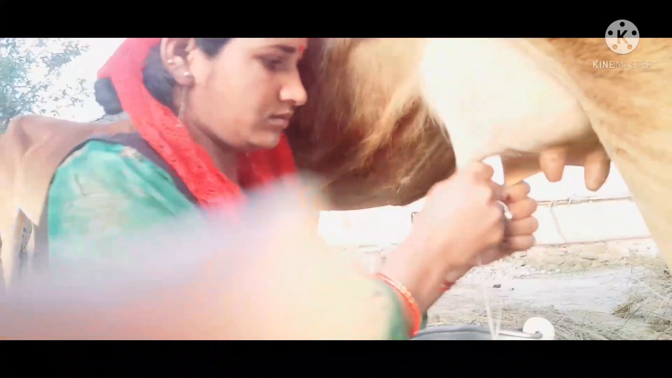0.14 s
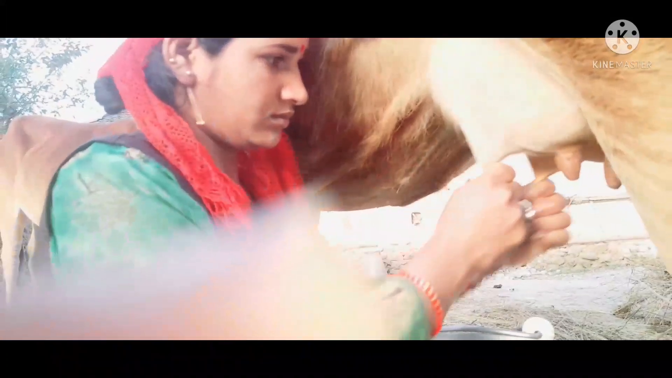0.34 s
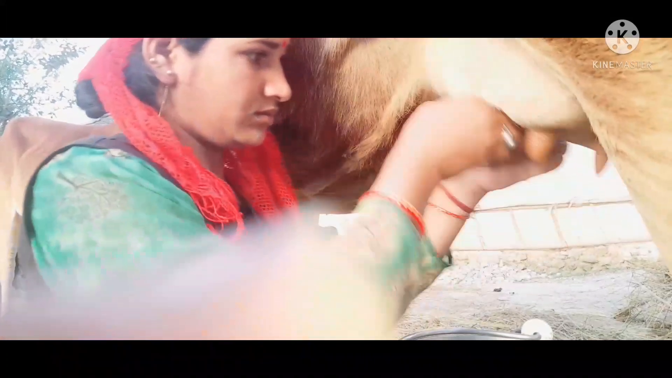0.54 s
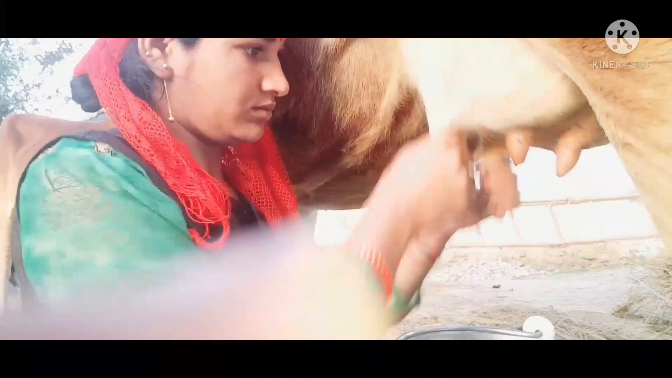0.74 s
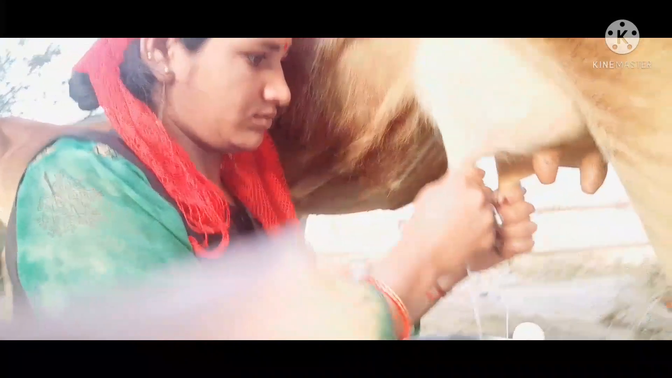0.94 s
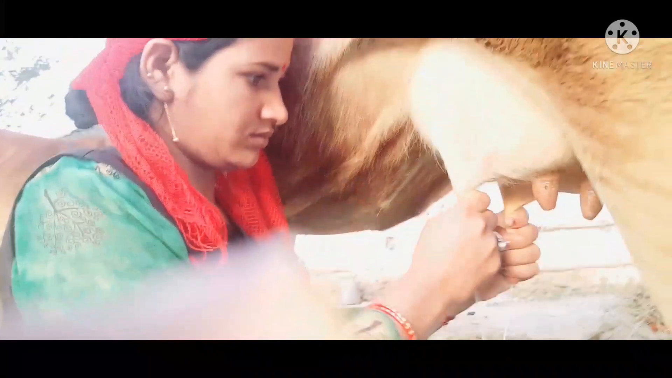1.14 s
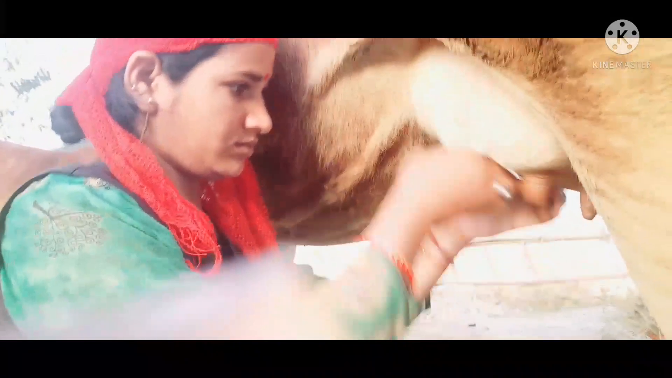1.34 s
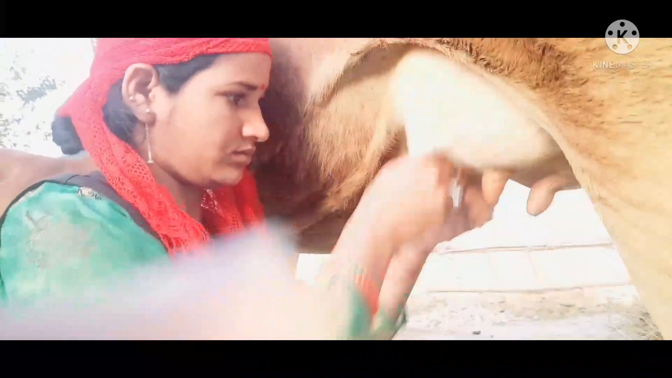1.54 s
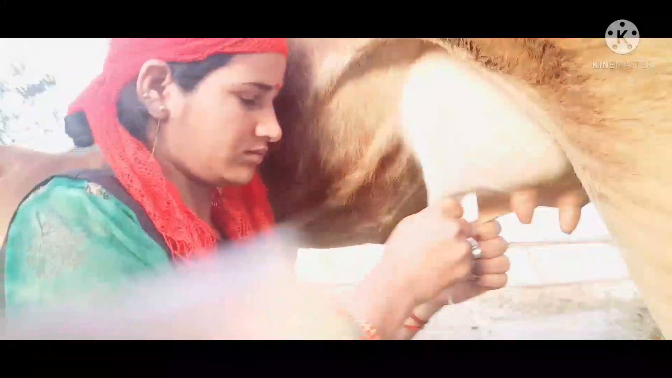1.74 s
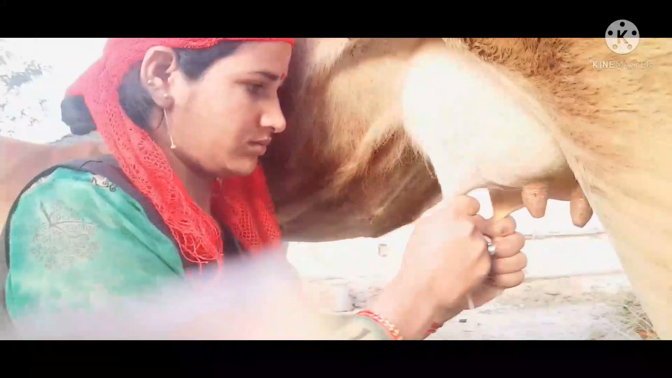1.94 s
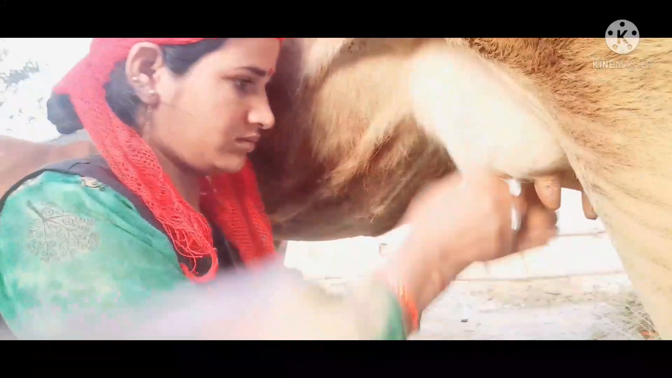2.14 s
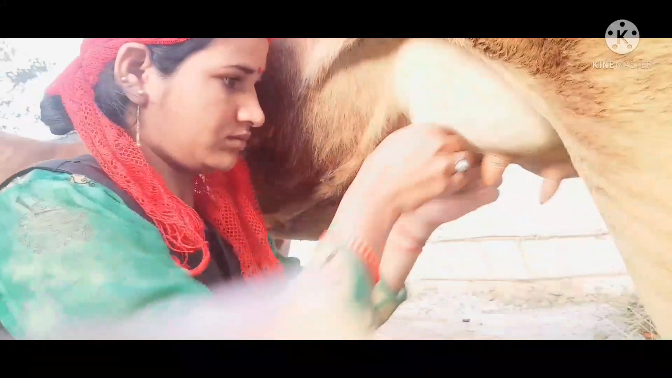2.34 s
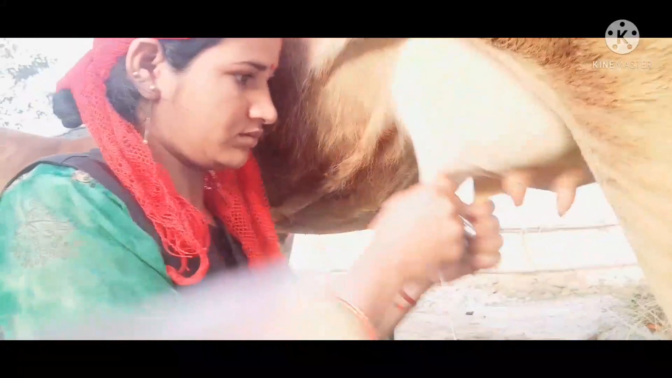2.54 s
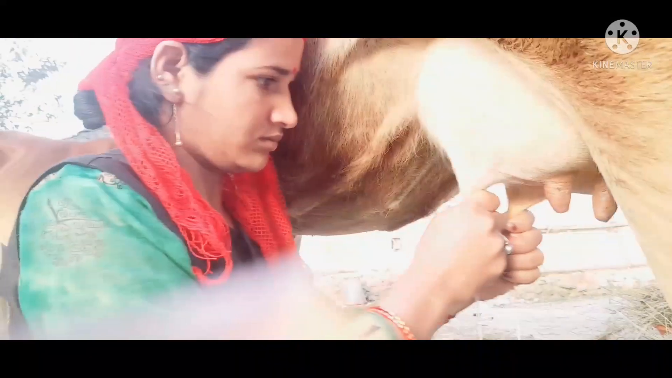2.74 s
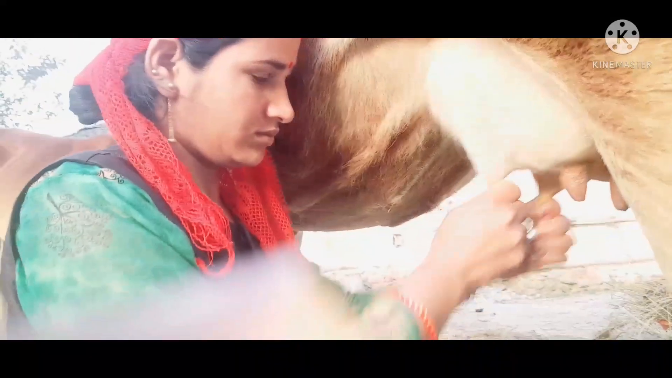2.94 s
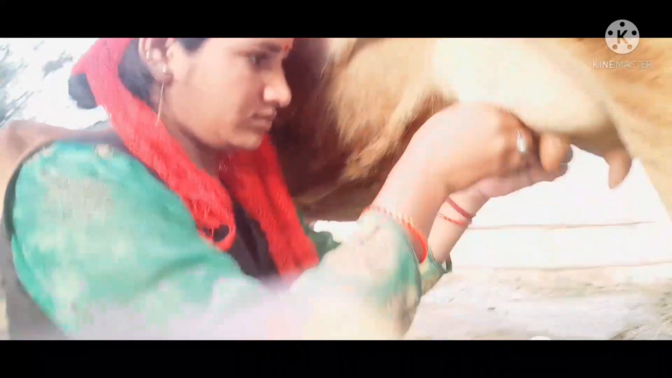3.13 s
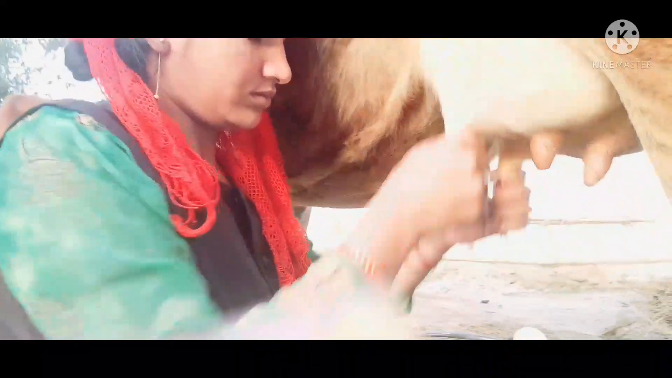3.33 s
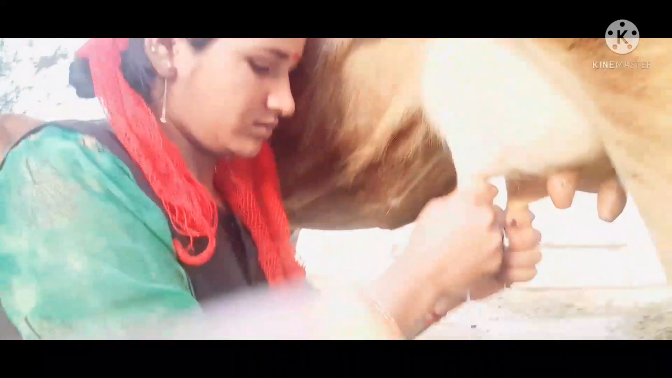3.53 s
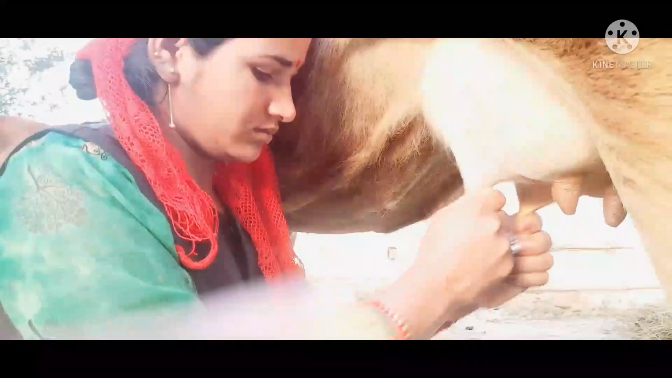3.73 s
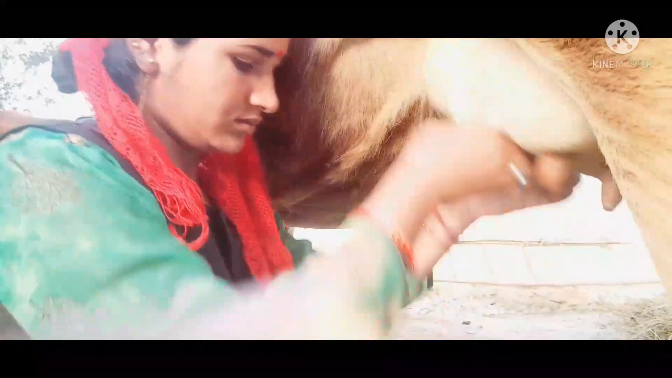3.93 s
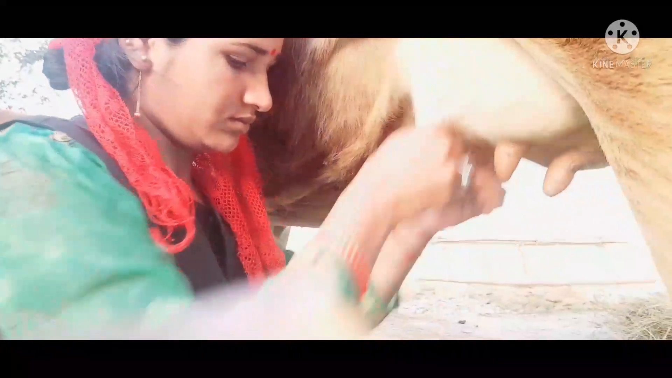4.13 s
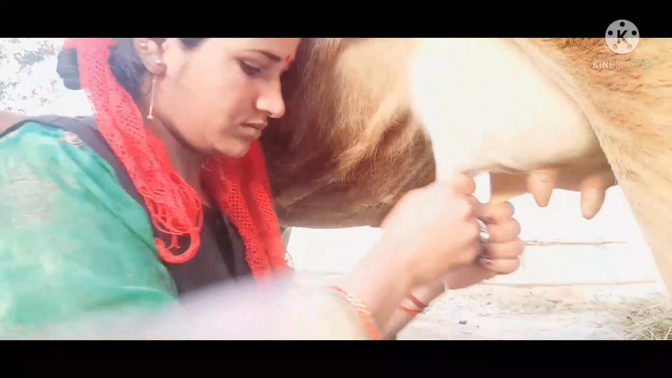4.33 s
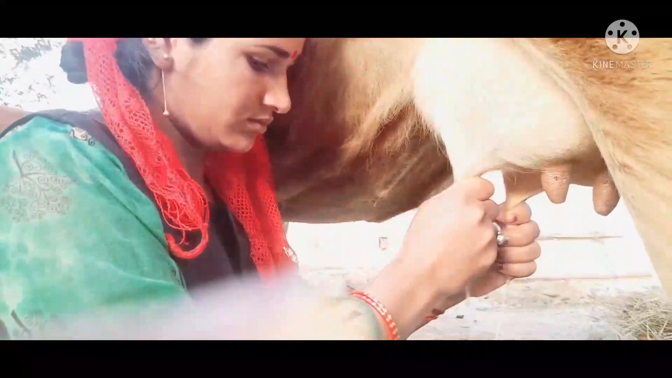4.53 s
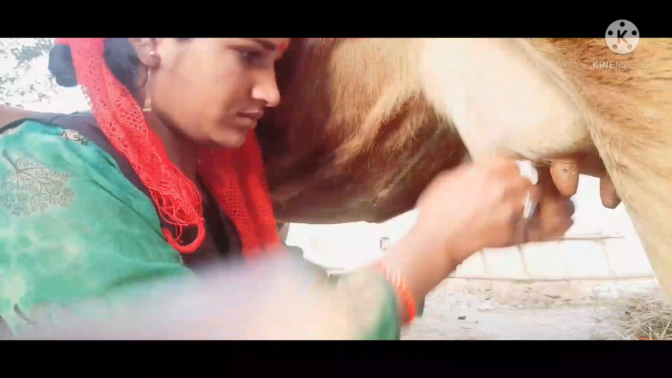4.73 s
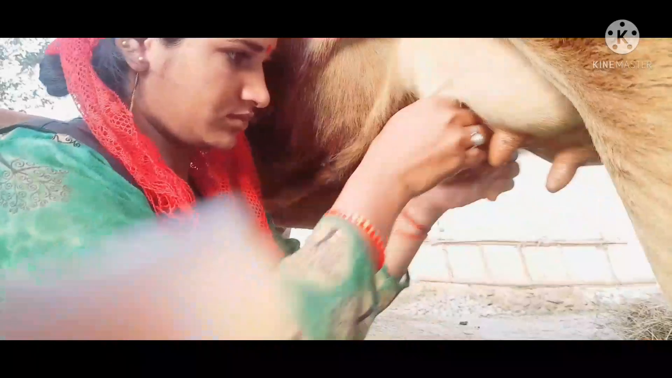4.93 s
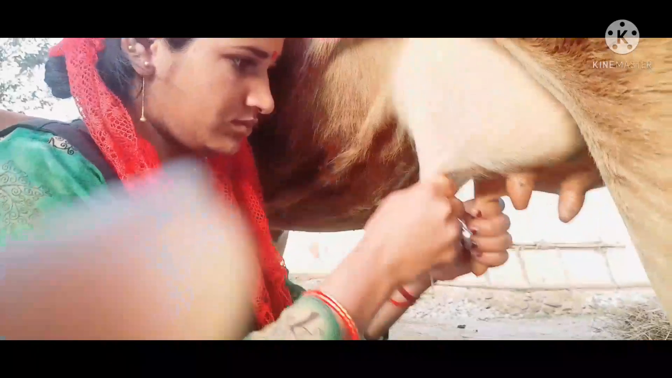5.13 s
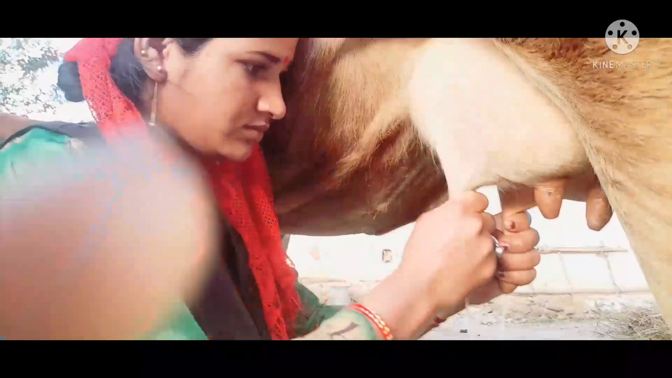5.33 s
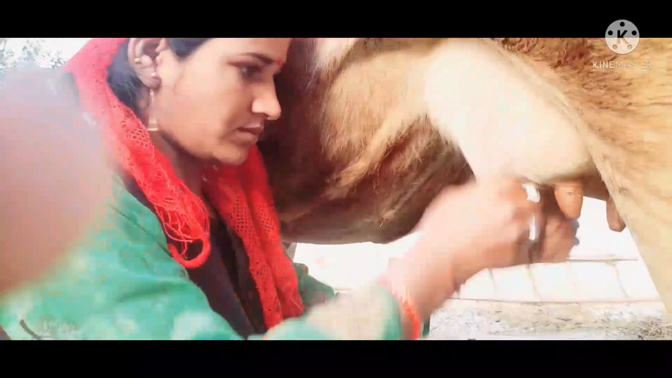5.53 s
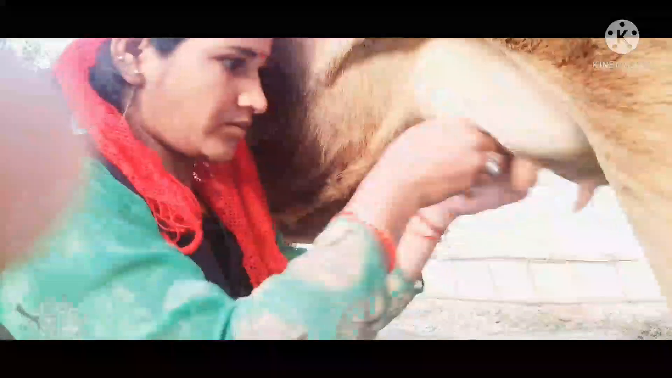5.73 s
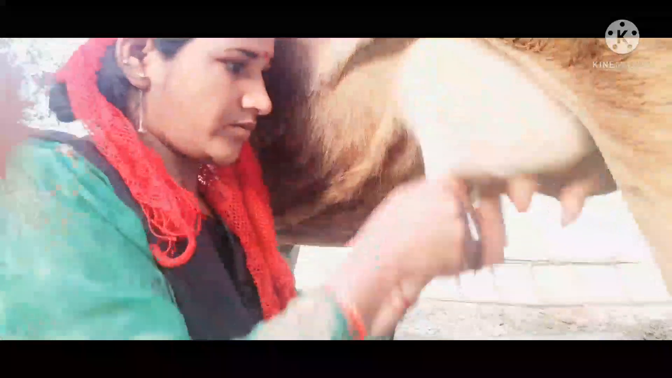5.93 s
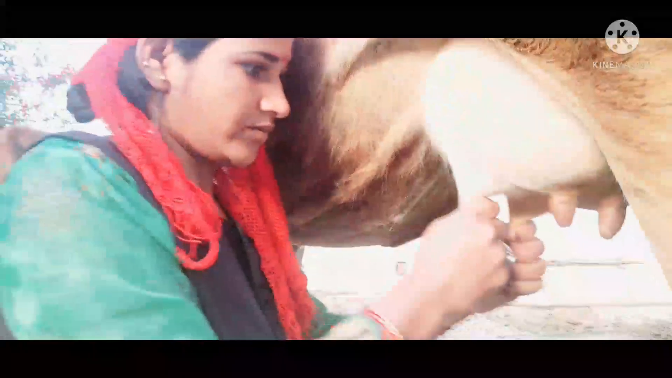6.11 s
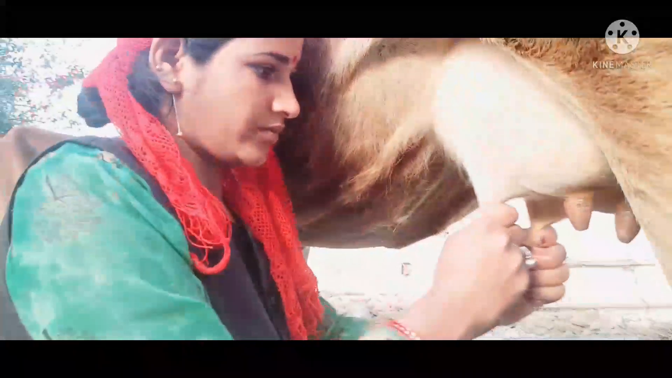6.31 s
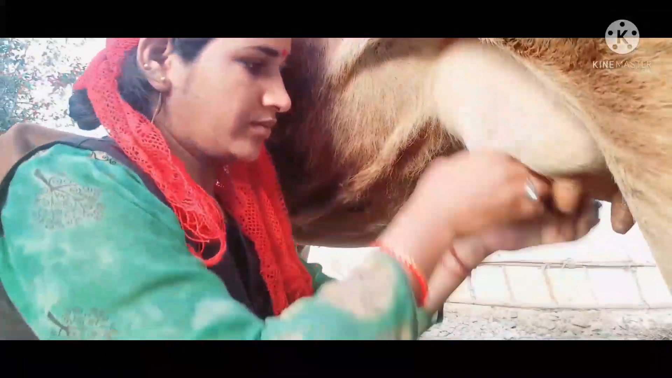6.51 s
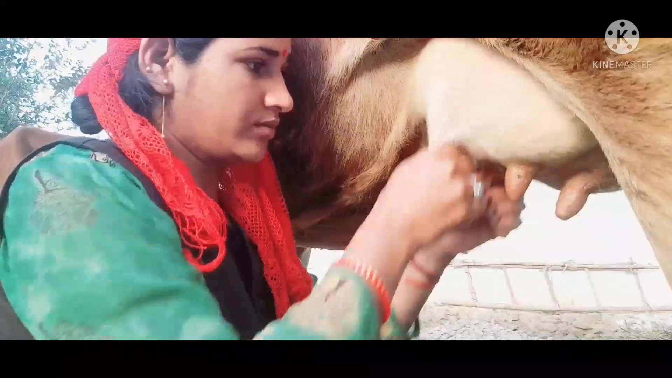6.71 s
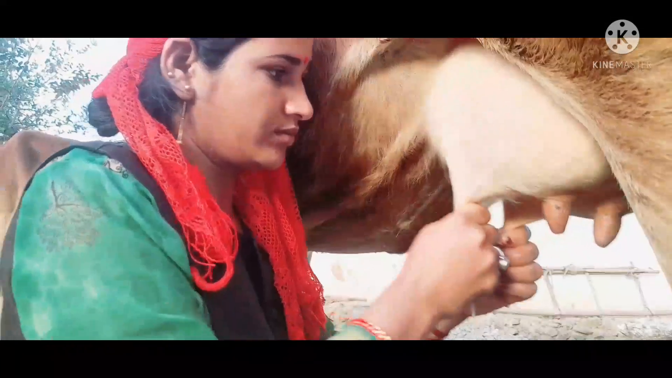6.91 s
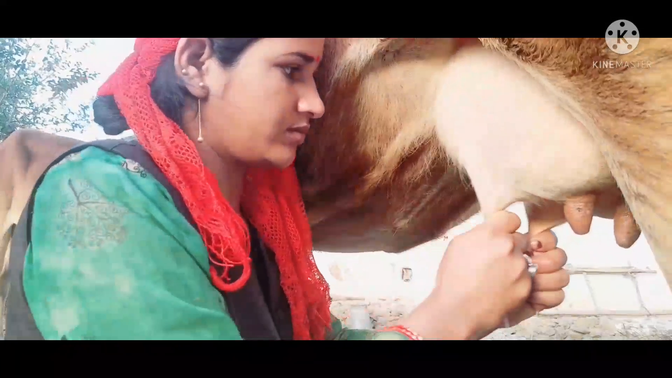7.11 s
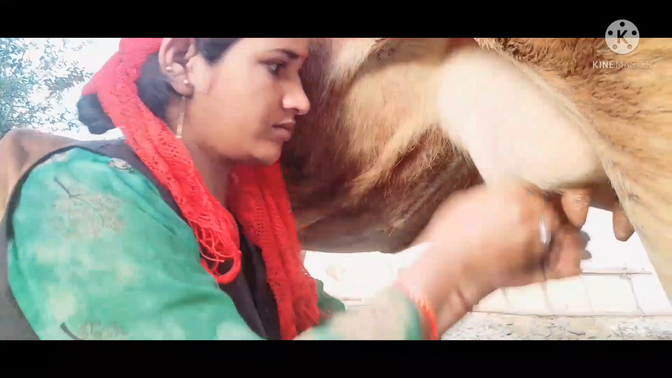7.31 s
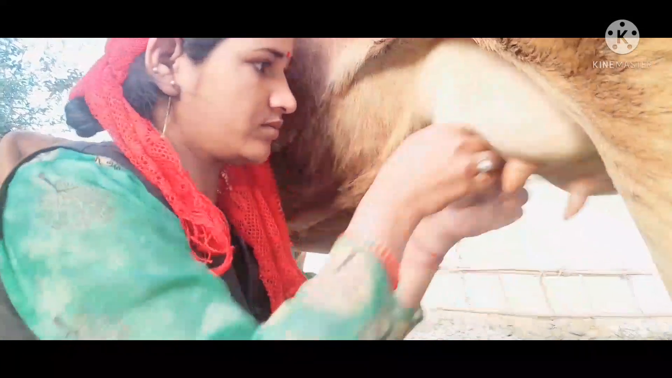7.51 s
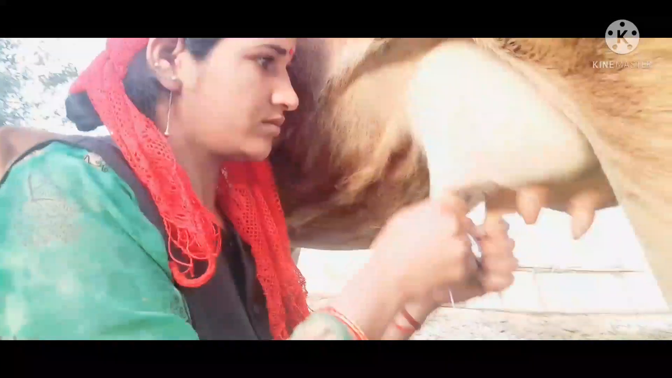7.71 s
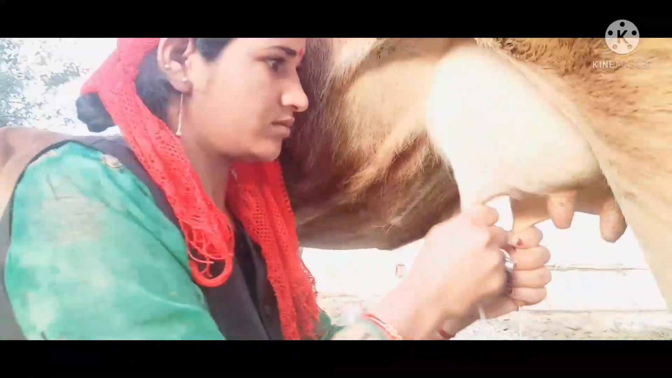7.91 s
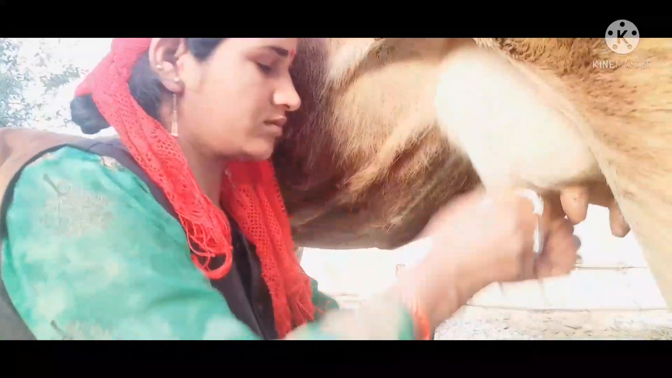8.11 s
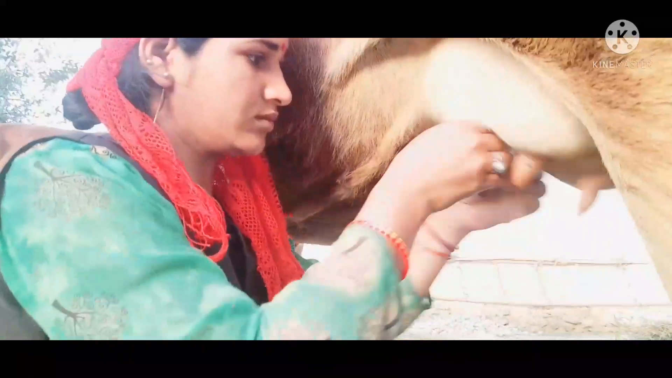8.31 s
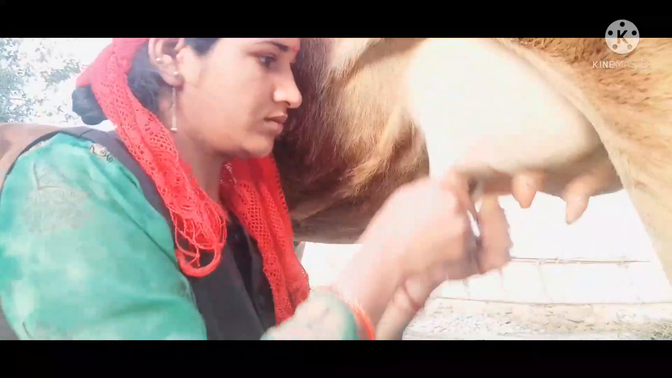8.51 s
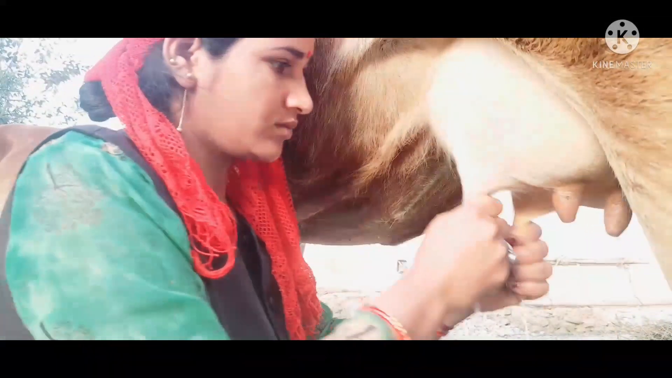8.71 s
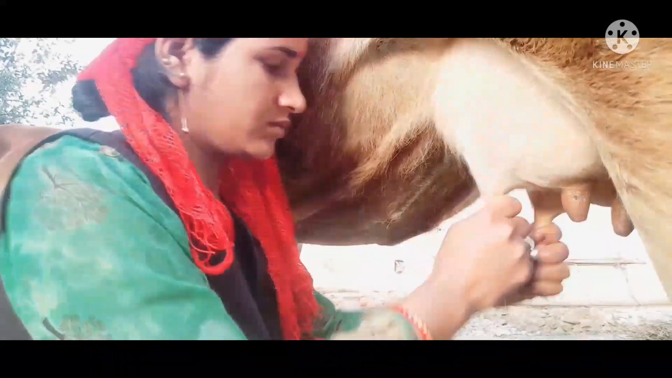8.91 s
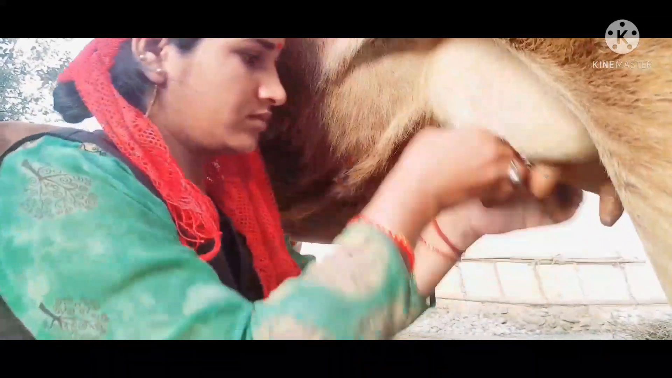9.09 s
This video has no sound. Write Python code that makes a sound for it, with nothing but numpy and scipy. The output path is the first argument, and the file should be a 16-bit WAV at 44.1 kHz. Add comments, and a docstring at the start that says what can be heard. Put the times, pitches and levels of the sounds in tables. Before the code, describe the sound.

Close hand milking: steady wet squirts splash into a ringing, froth-filled metal bowl, with chirping birds to the right and faint outdoor hum.

```python
"""Hand milking in a yard

Close to the microphones, a cow is milked by hand: both fists pull together, jets shoot into a metal bowl of frothy milk.
With each swell of pressure, noise-burst droplets hiss and splash; then the stream digs in and churns ringing bubbles.
Hard spurts slap the bowl as short pitched noise bursts, and its metal modes ring on; sleeves rustle as shaped noise.
Small birds chip, whistle and slur as gliding pure tones, scattered echoes come from the yard walls, and the air hums low."""
import sys
import numpy as np
from scipy import signal
from scipy.fft import rfft, irfft, next_fast_len
from scipy.io import wavfile
from scipy.ndimage import uniform_filter1d, map_coordinates

SR = 44100
rng = np.random.default_rng(int(sys.argv[2]) if len(sys.argv) > 2 else 0)


def dump_mix(stems):
    """Bounce the given channels to the path in sys.argv[1] as a 16-bit WAV at rate SR."""
    frames = np.atleast_2d(stems).T  # one column per channel
    limited = np.clip(frames, -1, 1)  # hard clip at full scale
    pcm = np.round(limited * 32767).astype(np.int16)
    wavfile.write(sys.argv[1], SR, pcm)


N = 403515


def amp(db):
    """Decibels to gain."""
    return np.exp(np.asarray(db) * (np.log(10) / 20))


def unit(x):
    """x at rms 1."""
    return x / np.sqrt(np.mean(x ** 2) + 1e-20)


def along(points, hz):
    """Interpolate (f/Hz, value) points on a log frequency axis."""
    f, v = np.transpose(points)
    return np.interp(np.log(hz + 1), np.log(f + 1), v)


def curves(rows, size=N):
    """One value per sample for each column after the time."""
    s, *cols = np.transpose(rows)
    return [np.interp(np.arange(size) / SR, s, c) for c in cols]


def wobble(rate):
    """A smooth random curve, rate knots a second."""
    step = 32
    at = np.arange(0, N + step, step)
    knots = rng.standard_normal(int(N * rate / SR) + 4)
    curve = map_coordinates(knots, [at * rate / SR])
    return np.interp(np.arange(N), at, curve)


def arch(u):
    """A swell from 0 to 1 and back while u runs from 0 to 1."""
    return np.abs(np.sin(np.pi * np.clip(u, 0, 1))) + 1e-6


def envelope(t, attack_s, hold_s, release_db_per_s):
    """A smooth rise, full strength until hold_s, then a steady fall in dB."""
    rise = np.sin(np.pi / 2 * np.clip(t / attack_s, 0, 1)) ** 2
    return rise * amp(-release_db_per_s * np.maximum(t - hold_s, 0)) + 1e-6


def filtered(x, response):
    """x times a response of frequency."""
    m = next_fast_len(N + SR // 2)
    return irfft(rfft(x, m) * response(np.fft.rfftfreq(m, 1 / SR)), m)[..., :N]


def add(track, s, sound):
    """Mix a sound into the track at time s."""
    part = track[..., max(round(s * SR), 0):][..., :sound.shape[-1]]
    part += sound[..., :part.shape[-1]]


def placed(x, lean_db, lag=3):
    """A source to the right reaches the left microphone a few samples late; lean_db is left minus right."""
    side = np.array([[.5], [-.5]])

    def response(hz):
        return amp(side * lean_db(hz)) * np.exp(-2j * np.pi * hz * side * lag / SR)
    return filtered(x, response)


def echo(x, decay):
    """Scattered reflections as decaying noise; each frequency dies at its own speed."""
    longest_s = min(max(t60 for _, t60 in decay), .5)
    noise = rng.standard_normal((2, SR // 2))[:, :int(longest_s * SR)]
    hz, t, z = signal.stft(noise, SR, nperseg=256)
    fading = amp(-60 * t / along(decay, hz)[:, None])
    tail = signal.istft(z * fading, SR, nperseg=256)[1]
    late = np.pad(x, (SR // 200, 0))[None]  # the first reflection comes 5 ms late
    return signal.oaconvolve(late, tail / np.linalg.norm(tail[0]), axes=1)[:, :N]


# outdoor air, relative spectrum: [f/Hz, level/dB per Hz]
AIR_SPECTRUM = [(25, -22), (62, 3), (200, 2), (420, -7), (1500, -12), (3100, -2), (5500, -9), (8000, -13),
                (14000, -10.5), (15500, -33)]
AIR_DB = -63.5  # mean level, before it wavers


def air():
    """Open-air background, partly alike at both microphones: low rumble and a treble haze, wavering together."""
    noise = rng.standard_normal(N) + 1.2 * rng.standard_normal((2, N))
    floor = unit(filtered(noise, lambda hz: amp(along(AIR_SPECTRUM, hz))))
    return floor * amp(AIR_DB + 1.2 * wobble(2.4)) * amp([[-.7], [.7]])


# echo decay between the yard walls: [f/Hz, t60/s]
YARD_DECAY = [(300, 0.26), (3200, 0.5), (7000, 0.46), (14000, 0.4)]
NEAR_DB = -49.5  # notes quieter than this come from further off


def note(hz, db, waver=0.0088):
    """A bird's pure tone on a slightly unsteady pitch; the further off, the larger its share of echoes."""
    drift = np.interp(np.arange(len(hz)), np.linspace(0, len(hz), 16), rng.standard_normal(16))
    phase = 2 * np.pi * np.cumsum(hz * (1 + waver * drift)) / SR
    tone = amp(db) * np.sqrt(2) * np.sin(phase)
    heard = amp(-8) * echo(tone, YARD_DECAY)
    add(heard, 0, amp(-1.0) * echo(tone, [(1000, 0.13)]))
    direct = amp(.7 * min(db.max() - NEAR_DB, 0))
    add(heard, 0, direct * np.array([tone, tone]))
    return heard


CHIP_TOP_HZ, CHIP_BOTTOM_HZ = 6976, 2000  # a chip drops from one pitch toward the other
CHIP_KNEE_S, CHIP_DROP_S = 0.023, .008  # when it falls fastest, and how abruptly
CHIP_ATTACK_S, CHIP_HOLD_S, CHIP_RELEASE_DB_PER_S = 0.003, 0.035, 1450
# falling chips at their source: [t/s, level/dB]
CHIP_NOTES = [(1.368, -47.5), (1.667, -41.5), (2.271, -38), (2.563, -39), (2.874, -37.5), (3.183, -41),
              (3.494, -37), (3.818, -39.5), (4.131, -41), (4.775, -43), (5.089, -43), (5.733, -40.5),
              (6.061, -40), (6.387, -39.5)]


def chips(song):
    """Sharp calls that sweep steeply down in pitch."""
    t = np.arange(SR // 16) / SR
    fall = 1 / (1 + np.exp((t - CHIP_KNEE_S) / CHIP_DROP_S))
    chip_hz = CHIP_BOTTOM_HZ + (CHIP_TOP_HZ - CHIP_BOTTOM_HZ) * fall
    chip_db = 20 * np.log10(envelope(t, CHIP_ATTACK_S, CHIP_HOLD_S, CHIP_RELEASE_DB_PER_S))
    for s, db in CHIP_NOTES:
        add(song, s, note(chip_hz, db + chip_db))


SLUR_BOW = 0.024  # a slur arches above the straight glide by this share of its pitch
# slurred notes at their source: [start t/s, length t/s, first f/Hz, last f/Hz, level/dB]
SLUR_NOTES = [(0.517, 0.085, 2840, 2140, -56), (3.772, .07, 6330, 5380, -38),
              (3.829, 0.055, 5930, 3880, -31), (3.953, .083, 6020, 2550, -34),
              (4.059, 0.041, 5050, 2760, -40.5), (4.102, 0.042, 3000, 4050, -37.5),
              (4.123, .085, 3866, 3840, -39), (4.203, 0.044, 2970, 4250, -38),
              (4.259, 0.052, 2590, 6050, -37), (4.73, 0.026, 2640, 2480, -50),
              (4.828, 0.063, 1860, 1520, -60.5), (4.909, 0.13, 3900, 3140, -52.5),
              (5.582, 0.041, 4830, 3530, -51), (5.699, 0.076, 3770, 4420, -53.5),
              (5.89, 0.063, 6200, 8000, -58), (6.389, 0.033, 6580, 4430, -38.5),
              (6.472, 0.12, 5470, 4180, -45), (6.481, 0.044, 1960, 2350, -55),
              (6.544, 0.044, 3080, 2880, -41.5), (7.418, .24, 2475, 2760, -65),
              (8.191, 0.24, 4140, 3280, -55), (8.555, 0.034, 4840, 4280, -54)]


def slurs(song):
    """Song notes that glide in a slight arch from one pitch to another."""
    for s, length, first_hz, last_hz, db in SLUR_NOTES:
        u = np.linspace(0, 1, int(length * SR))
        glide = (first_hz + (last_hz - first_hz) * u) * (1 + SLUR_BOW * arch(u))
        add(song, s, note(glide, db + 20 * np.log10(arch(u))))


WHISTLE_S, WHISTLE_SWELL = .098, .9  # length, and how pointed its swell is
WHISTLE_START_HZ, WHISTLE_END_HZ = 3492, 3117
WHISTLE_TIRE_HZ_PER_S = 38  # each whistle starts a little lower than the one before
# nearly level whistles at their source: [t/s, level/dB]
WHISTLE_NOTES = [(1.456, -40), (1.755, -37), (2.055, -35), (2.363, -34.5), (2.658, -36), (2.96, -37),
                 (3.277, -38.5), (3.603, -36), (3.912, -40), (4.247, -40), (4.552, -37.5), (4.877, -43),
                 (5.189, -38), (5.514, -39.5), (5.844, -43), (6.132, -44), (6.489, -49.5)]


def whistles(whistling):
    """Nearly level tones that swell and fade."""
    u = np.linspace(0, 1, int(WHISTLE_S * SR))
    swell_db = 20 * np.log10(arch(u) ** WHISTLE_SWELL)
    for s, db in WHISTLE_NOTES:
        first_hz = WHISTLE_START_HZ - WHISTLE_TIRE_HZ_PER_S * s
        glide = first_hz + (WHISTLE_END_HZ - first_hz) * u
        add(whistling, s, note(glide, db + swell_db))


WHISTLE_LEAN_DB, WHISTLE_TURN_DB_PER_S = -1.5, -0.37  # extra left minus right; it drifts further right


def birds():
    """Chips alternate with whistles, and slurred notes slip in, all to the right of the microphones."""
    song, whistling = np.zeros((2, 2, N))
    chips(song)
    slurs(song)
    whistles(whistling)
    turn_db = WHISTLE_LEAN_DB + WHISTLE_TURN_DB_PER_S * np.arange(N) / SR
    return placed(song + whistling * amp([turn_db / 2, -turn_db / 2]), lambda hz: -5)


# sleeves and hands brushing between pulls: [start t/s, length t/s, level/dB at mid-swell before flutter]
BRUSH_STROKES = [(3.01, 0.17, -52.5), (8.264, 0.45, -55.5), (9.047, .14, -53)]


def rustle():
    """Cloth and skin brush softly as the hands take a new grip: fluttering treble noise."""
    t = np.arange(N) / SR
    rubbing = sum(amp(db) * arch((t - s) / length) ** 2 for s, length, db in BRUSH_STROKES)
    spectrum = [(1000, -34.0), (5000, -20), (15000, -29)]
    brush = filtered(rng.standard_normal((2, N)), lambda hz: amp(along(spectrum, hz)))
    return rubbing * amp(1.2 * wobble(34)) * unit(brush)


def knocks(rows, width):
    """Short bursts of noise that ring around one pitch and die away."""
    track, t = np.zeros(N), np.arange(SR // 4) / SR
    for s, db, pitch_hz, t60 in rows:
        edges = np.clip(pitch_hz * np.exp([-width, width]), 20, SR / 2.1)
        band = signal.butter(2, edges, "bandpass", fs=SR, output="sos")
        ring = signal.sosfilt(band, rng.standard_normal(len(t)) * amp(-60 * t / t60))
        add(track, s, amp(db) * ring / abs(ring).max())
    return track


# metal modes of the bowl: [f/Hz, t60/s, relative level/dB]
BOWL_MODES = [(348, 0.41, -8), (513, 0.68, -4), (594, 0.13, -17), (820, 0.53, 4), (1100, 0.73, -14),
              (1345, 0.1, 13), (1930, 0.19, -23.5)]


def ringing(x):
    """The metal rings on at its own modes, damped by the milk."""
    t = np.arange(SR // 2) / SR
    ring = sum(amp(db - 60 * t / t60) * np.sin(2 * np.pi * hz * t) / t60 for hz, t60, db in BOWL_MODES)
    return signal.fftconvolve(x, ring / abs(rfft(ring)).max())[:N]


def droplets(rate, spread_db, t60):
    """Random impacts of unequal size, each a brief noise burst; two unrelated versions of the same impacts."""
    struck = rng.random(N) < rate / SR
    energy = struck * amp(spread_db * np.clip(rng.standard_normal(N), -2, 2)) ** 2
    fading = signal.lfilter([1], [1, -amp(-60 / (t60 * SR)) ** 2], energy)
    return np.sqrt(fading) * rng.standard_normal((2, N))


def bubbles(rate, centre_hz, spread, cycles, size_db, rise, count=3000):
    """Air pockets ring briefly, rising in pitch as they near the surface."""
    draw, gaps = rng.standard_normal((count, 2)), rng.exponential(size=count)
    start = np.cumsum(gaps) / rate
    draw, start = draw[start < N / SR], start[start < N / SR]
    t = np.arange(SR // 30) / SR
    turns = centre_hz * np.exp(spread * draw[:, :1]) * t
    age = turns / cycles  # 1 when the ring is 60 dB down
    size = amp(size_db * np.clip(draw[:, 1:], -2, 2))
    pops = size * np.exp(-np.log(1000) * age) * np.sin(2 * np.pi * turns * (1 + rise * age))
    at = (start[:, None] * SR).astype(int) + np.arange(len(t))
    return np.bincount(at.ravel(), pops.ravel(), N)[:N]


# likeness of left and right microphone: [f/Hz, correlation 0..1]
LIKENESS = [(60, 0.43), (150, 0.48), (380, 0.28), (950, 0.8), (2400, 0.23), (6000, 0.028), (15000, 0.046)]


def bowl(pair, spectrum, patchy_db):
    """Impacts reach the microphones partly alike, their colour shifting as the jets wander over the bowl. Rms 1."""
    hz, _, z = signal.stft(pair, SR, nperseg=1024)
    field = uniform_filter1d(rng.standard_normal(z.shape[1:]), size=9, axis=0)
    field = uniform_filter1d(field, size=9, axis=1)
    turn = np.arccos(np.clip(along(LIKENESS, hz), 0, 1)) / 2
    colour = amp(along(spectrum, hz)) * np.array([np.cos(turn), np.sin(turn)])
    patchy = z * colour[..., None] * amp(patchy_db * unit(field))
    mid, side = signal.istft(patchy, nperseg=1024)[1][:, :N]
    return unit(np.array([mid + side, mid - side]))


HISS_POWER, HISS_SAG_DB_PER_S = 1.13, 6  # hiss grows with pressure and fades as the teat empties
SPLASH_POWER, SPLASH_SAG_DB_PER_S = 1.605, 3.5  # big drops need more pressure
PLUNGE_ATTACK_S, PLUNGE_SAG_DB_PER_S, PLUNGE_RELEASE_DB_PER_S = 0.082, 18, 224
PLUNGE_END = 0.8  # share of the pull after which the stream no longer digs in
STIR_DB = -25  # the splash alone stirs the froth a little
ENTRY_S, ENTRY_DB = 0.14, 1.5  # length of the jets' entry, and its gain over the churn column
ENTRY_LEAD_S = 0.019  # it opens this long before the churning
# pulls: [start t/s, length t/s, t/s until the jets dig in, then relative level/dB of hiss, splash, churn]
PULL_STROKES = [(.010, .45, 0.17, -37.5, -39.5, -36), (0.856, 0.45, 0.095, -38, -37.5, -37),
                (1.727, 0.41, .096, -36, -38, -40), (2.602, 0.4, 0.11, -37, -37, -38),
                (3.433, 0.42, 0.088, -37, -37, -38), (4.279, 0.46, 0.14, -36.5, -35.5, -35.5),
                (5.19, 0.41, 0.077, -36, -38.5, -39.5), (5.998, 0.46, 0.13, -37.5, -34.5, -35.5),
                (6.871, 0.44, 0.11, -34, -38, -39.5), (7.748, 0.42, 0.12, -39.5, -43.5, -42.5),
                (8.611, 0.45, 0.096, -37, -38.5, -42)]


def flow():
    """Gains of hiss and splash, which follow the fists' pressure, and of entry and churning, which come later."""
    clock = np.arange(0, N, 64) / SR
    jet, surface, entry, plunge = np.zeros((4, len(clock)))
    for s, length, dig_s, hiss_db, splash_db, churn_db in PULL_STROKES:
        t = np.clip(clock - s, 0, length)
        pressure, past_peak = arch(t / length), t - length / 2
        jet += amp(hiss_db - HISS_SAG_DB_PER_S * past_peak) * pressure ** HISS_POWER
        surface += amp(splash_db - SPLASH_SAG_DB_PER_S * past_peak) * pressure ** SPLASH_POWER
        digging = clock - s - dig_s
        entry += amp(churn_db + ENTRY_DB) * arch((digging + ENTRY_LEAD_S) / ENTRY_S) ** 2
        hold_s = PLUNGE_END * length - dig_s
        depth = envelope(digging, PLUNGE_ATTACK_S, hold_s, PLUNGE_RELEASE_DB_PER_S)
        plunge += amp(churn_db - PLUNGE_SAG_DB_PER_S * past_peak) * depth
    return curves(np.column_stack([clock, jet, surface, entry, plunge + amp(STIR_DB) * surface]))


AIM_DB, AIM_DB_PER_S = -1.9, 0.38  # left minus right of the jets, drifting leftward as the pulls go on
# relative spectra of fine spray, big drops, churned froth, and the shallow hollow as the jets first
# dig in: [f/Hz, level/dB per Hz]
HISS_SPECTRUM = [(1500, -24.5), (2800, 0), (3700, 0), (4600, -2), (5500, -6.5), (6800, -3), (10000, -5.5),
                 (12500, -7.5), (15000, -7.5), (16000, -23)]
SPLASH_SPECTRUM = [(400, -77), (700, -5.5), (820, -4.5), (960, -10), (1090, 5), (1220, -4), (1385, 6),
                   (1600, -0.5), (1890, 2.5), (2100, -3), (2650, 3.5), (3300, -2.5), (4300, -1.5),
                   (6500, -49.5)]
FROTH_SPECTRUM = [(40, -41), (120, -5.5), (220, -14), (345, -0.5), (430, -9), (530, 0.5), (720, -4),
                  (880, 1), (1100, -8), (2000, -25)]
ENTRY_SPECTRUM = [(350, -38), (620, -3), (780, 1), (950, -14), (1400, -7.5)]
# hard spurts on the bowl: [t/s, relative peak level/dB, f/Hz, t60/s]
SPURTS = [(.125, -26, 2350, 0.5), (.178, -19, 2090, 0.18), (.415, -35, 2700, 0.086),
          (.910, -30, 2810, 0.056), (1.04, -17, 2890, 0.026), (1.189, -19, 2760, .038),
          (1.79, -27.5, 2080, 0.072), (1.836, -12.5, 2550, .066), (1.848, -15, 1920, 0.024),
          (2.12, -38, 2250, .06), (2.792, -21.5, 2490, 0.041), (2.99, -27, 8200, 0.036),
          (3.484, -29, 2850, .03), (3.512, -17.5, 2700, 0.13), (3.785, -25.5, 1210, 0.12),
          (5.283, -22, 2680, 0.22), (5.485, -13.5, 9100, .04), (6.241, -17.5, 3100, 0.042),
          (6.38, -19, 8700, 0.077), (6.919, -29, 6450, 0.015), (6.956, -26, 2190, 0.28),
          (6.987, -22, 2320, 0.06), (7.809, -23, 2940, 0.032), (8.18, -46, 1530, 0.067),
          (8.66, -26, 6900, 0.0071), (8.711, -17.5, 2820, 0.13)]
# soft bumps of the hands and bowl: [t/s, peak level/dB before placing, f/Hz, t60/s]
SOFT_BUMPS = [(1.33, -51.5, 196, 0.45), (4.76, -50, 141, 0.16), (6.25, -51, 80, 1), (6.52, -47, 187, 0.7),
              (7.412, -54, 325, 0.13)]
# left minus right microphone: [f/Hz, level/dB]
MILK_LEAN = [(100, -2), (350, 1), (700, -6), (1300, -4.5), (2400, -13), (4400, 1), (8000, 0.5), (15000, -5)]


def milk():
    """The jets break into droplets: fine ones hiss, big ones splash, and the plunging stream churns the froth."""
    jet, surface, entry, plunge = flow()
    sputter_db = .9 * wobble(90) + .8 * wobble(22)  # the stream sputters
    spray = droplets(rate=2600, spread_db=3.5, t60=.008)
    splatter = droplets(rate=650, spread_db=4, t60=.017)
    # the plunging stream both traps air and thuds on the milk
    trapped = bubbles(rate=280, centre_hz=493.2, spread=0.3324, cycles=30.5, size_db=2.5, rise=0.13)
    pockets = np.array([unit(trapped), unit(splatter[0])])
    hiss = jet * amp(5) * bowl(spray, HISS_SPECTRUM, patchy_db=3.5)
    splash = surface * amp(1.5) * bowl(splatter, SPLASH_SPECTRUM, patchy_db=3.0)
    churn = plunge * amp(-1.97) * bowl(pockets, FROTH_SPECTRUM, patchy_db=1.4)
    hollow = entry * bowl(splatter, ENTRY_SPECTRUM, patchy_db=1)
    wet = amp(sputter_db) * (hiss + splash + hollow + churn)
    wet = wet + amp(-2.1) * knocks(SPURTS, width=0.24)
    aim_db = AIM_DB + AIM_DB_PER_S * np.arange(N) / SR
    wet = wet * amp([aim_db / 2, -aim_db / 2])
    metal = amp(1.5) * ringing(wet.mean(axis=0))
    bumps = knocks(SOFT_BUMPS, width=.4)
    return placed(wet + metal + bumps, lambda hz: along(MILK_LEAN, hz))


def scene():
    """Milking close by, birds further off, all in the open yard."""
    squirts = milk()
    walls = amp(-13.5) * echo(squirts.mean(axis=0), YARD_DECAY)
    return squirts + walls + rustle() + birds() + air()


def record(dry):
    """The scene is kept below top_hz; nothing sounds above it."""
    top_hz = 15700
    return filtered(dry, lambda hz: hz < top_hz)


dry = scene()
out = record(dry)
dump_mix(out)
```